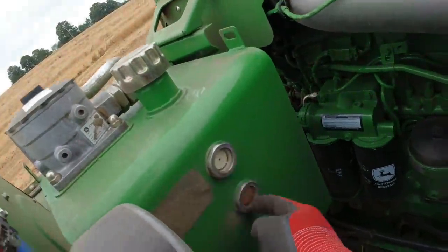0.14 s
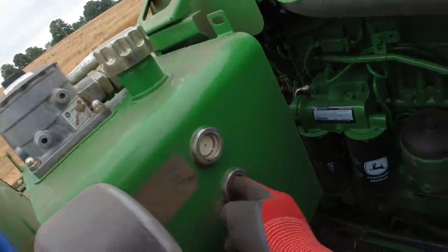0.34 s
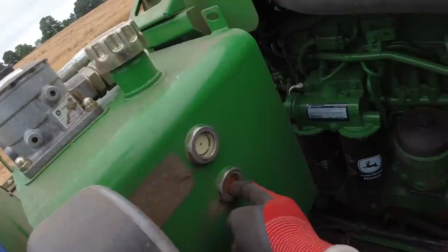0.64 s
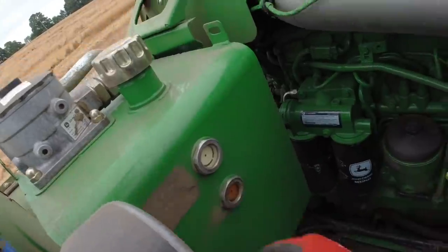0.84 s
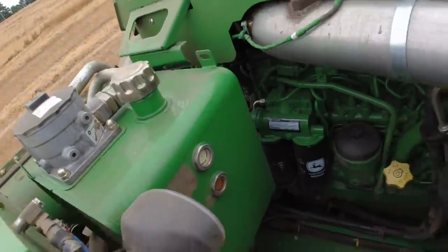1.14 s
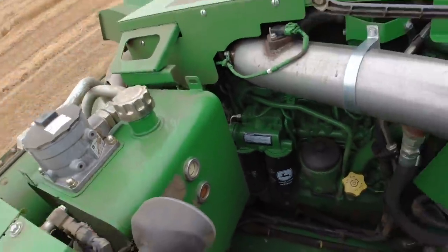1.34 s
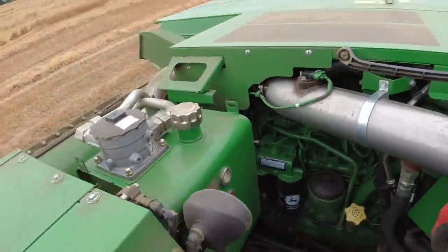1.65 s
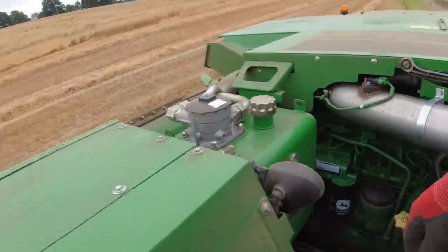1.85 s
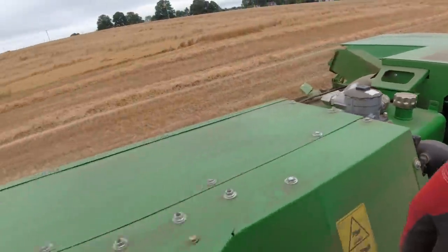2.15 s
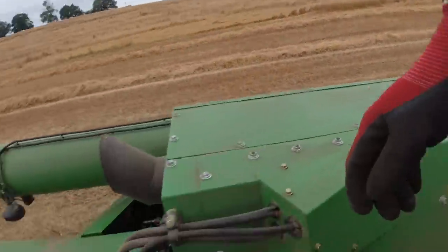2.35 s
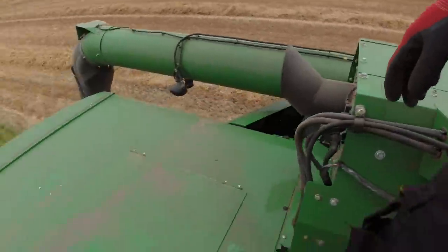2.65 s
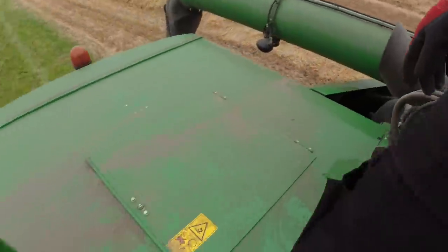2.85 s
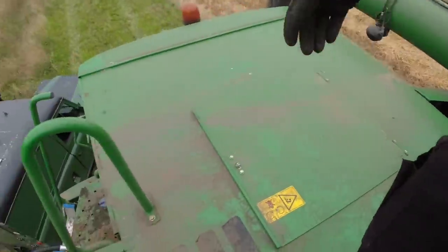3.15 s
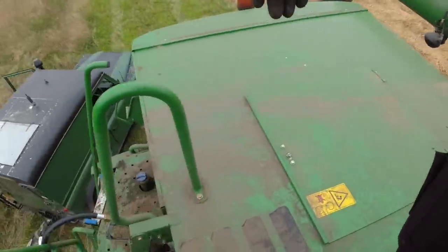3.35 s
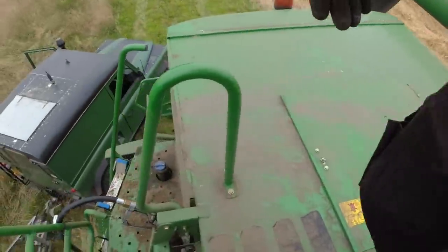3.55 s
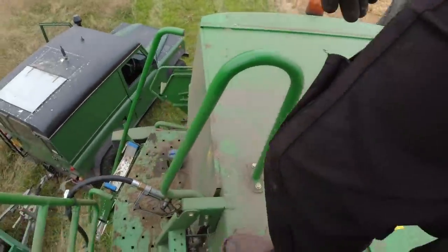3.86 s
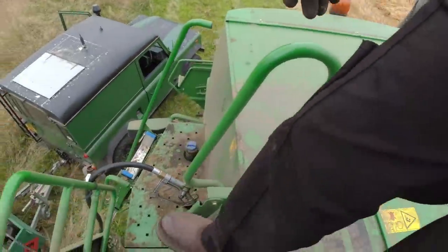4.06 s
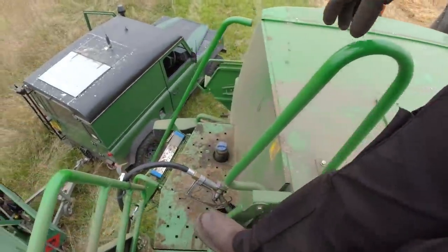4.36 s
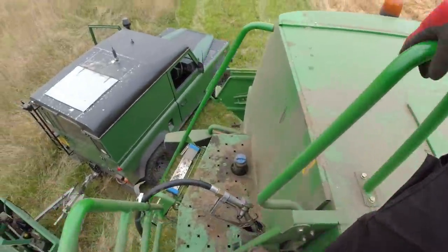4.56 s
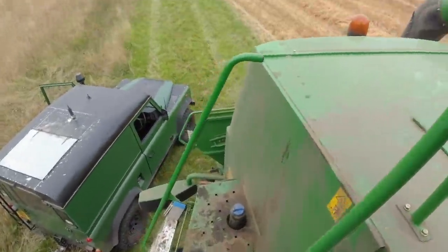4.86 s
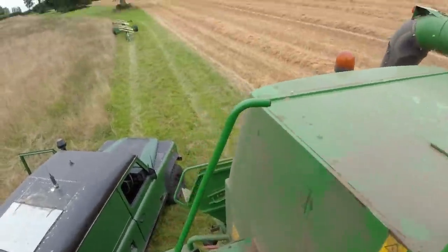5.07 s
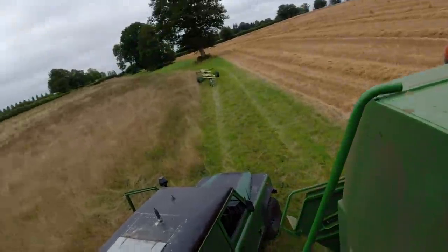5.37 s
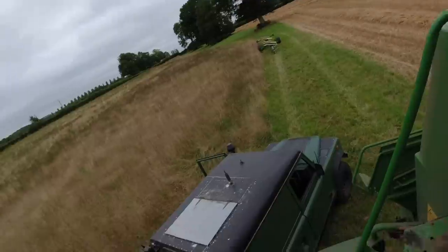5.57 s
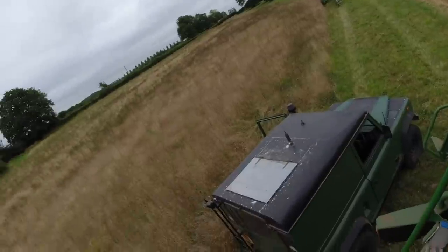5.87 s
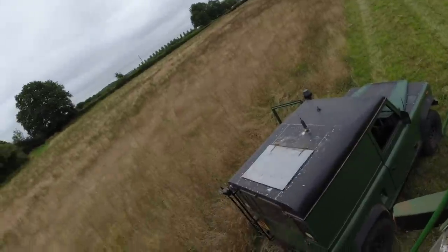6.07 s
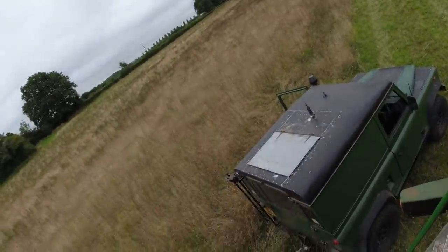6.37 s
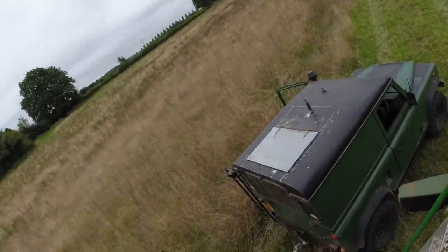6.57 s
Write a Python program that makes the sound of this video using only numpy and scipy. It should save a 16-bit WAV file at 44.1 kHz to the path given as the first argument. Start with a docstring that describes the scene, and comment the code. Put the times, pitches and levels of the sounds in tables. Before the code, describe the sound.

Wind thumps and rumbles in uneven gusts on a head-worn microphone outdoors. At first there is only soft clothing rustle and a shielded, quiet pump whine beneath it. Two hollow footfalls sound on a metal deck about a second apart, the first trailed by a light clinking. Then the electric pump below comes through clearly, whining, whirring and faintly ticking at a constant pitch until the end.

```python
"""Small pump below a harvester deck

On top of a parked harvester in a windy field, with a head-worn microphone. Somewhere below, an electric
pump whines, whirrs and faintly ticks: shielded by a tank at first, loud once we turn and step into view.
Wind buffets the diaphragm and clothes rustle close by. Underfoot, boots knock on the sheet-metal deck
and a loose fitting rattles."""
import sys
import numpy as np
from scipy import signal
from scipy.fft import rfft, irfft
from scipy.io import wavfile
from scipy.ndimage import uniform_filter1d

SR = 44100
rng = np.random.default_rng(int(sys.argv[2]) if len(sys.argv) > 2 else 0)


def transcribe(signal):
    """Save signal, clipped to [-1, 1], as a 16-bit WAV file at the path in sys.argv[1]."""
    frames = np.atleast_2d(signal).T
    limited = np.clip(frames, -1, 1)
    pcm = np.round(limited * 32767).astype(np.int16)
    wavfile.write(sys.argv[1], SR, pcm)


N = 295911
TIME = np.arange(N) / SR


def amp(db):
    return 10 ** (np.asarray(db) / 20)


def unit_rms(x):
    return x / np.sqrt(np.mean(x ** 2) + 1e-20)


def smooth(x, size):
    return uniform_filter1d(uniform_filter1d(x, size), size)


def at_pitch(spectrum, hz):
    f, db = np.transpose(spectrum)
    return np.interp(np.log(hz + 1), np.log(f + 1), db)


def at_time(table, t):
    s, *columns = np.transpose(table)
    return np.array([np.interp(t, s, column) for column in columns])


def drift(t, top_hz, count):
    """Rows of random wander near rms 1: sines of random phase, the slow ones larger."""
    f = np.geomspace(top_hz / 10, top_hz, 12)
    waves = np.sin(2 * np.pi * (f[:, None] * t + rng.random((count, len(f), 1)))) / np.sqrt(f)[:, None]
    return waves.sum(1) / np.sqrt(np.sum(.5 / f))


def coloured(x, spectrum):
    return irfft(rfft(x) * amp(at_pitch(spectrum, np.fft.rfftfreq(len(x), 1 / SR))), len(x))


def resonant_noise(length, peaks):
    """Noise through broad resonances, each passed twice for steep sides; rms 1."""
    noise = rng.standard_normal(length)
    filters = [(amp(db), signal.iirpeak(hz, hz / width, SR)) for hz, width, db in peaks]
    return unit_rms(sum(gain * signal.lfilter(*ba, signal.lfilter(*ba, noise)) for gain, ba in filters))


def shaped_noise(db, size):
    """Noise whose density in dB is given for every bin and frame."""
    bins = rng.standard_normal(db.T.shape).T + 1j * rng.standard_normal(db.T.shape).T
    return signal.istft(bins * amp(db) * np.sqrt(SR / size), nperseg=size, noverlap=size * 3 // 4)[1][:N]


def decay(t, db, t60):
    return amp(db - 60 * t / t60)


def struck_modes(t, modes, uneven_db, pitch=1):
    """Decaying sines of struck metal, in a new mix for each strike."""
    mix_db = uneven_db * rng.standard_normal(len(modes))
    return sum(decay(t, db + offset, t60) * np.sin(2 * np.pi * pitch * hz * t)
               for (hz, db, t60), offset in zip(modes, mix_db))


# Where we stand. Each row: time in seconds, stance (0 behind the tank, 4 facing the pump, 8 turned away).
STANCE = [(1.6, 0), (2.35, 1), (3.0, 2), (3.5, 3), (3.95, 4), (4.6, 5), (5.25, 6), (5.75, 7), (6.5, 8)]


def by_stance(db, t):
    """Blends levels given at evenly spaced stances as the microphone moves."""
    return np.interp(at_time(STANCE, t)[0], np.linspace(0, STANCE[-1][1], len(db)), db)


# How much of the pump reaches the microphone. Each row: time in seconds, path level in dB.
PATH = [(0.0, -74.5), (0.55, -72.5), (1.0, -74), (1.8, -72.5), (2.05, -66.5), (2.4, -65), (2.67, -62),
        (2.9, -54.5), (3.1, -50), (3.38, -45), (3.5, -45.5), (3.65, -44), (3.85, -42), (4.3, -44.5),
        (4.75, -46), (5.05, -49.5), (5.22, -53.5), (5.44, -51.5), (5.65, -48.5), (6.0, -48), (6.3, -48),
        (6.71, -47.5)]
# Its colour from where we stand. Each row: frequency in Hz, then gain in dB at each of nine stances.
PATH_COLOUR = [(400, -1.5, -1, -12.5, -16, -12.5, -10.5, -13, -13, -13.5),
               (990, -3, -2, -9.5, -10, -9.5, -6.5, -4.5, -7.5, -7),
               (1750, -2, -5.5, -1, -2.5, -4.5, -4, 1.5, -5, -5.5),
               (2730, -1, -4.5, -3.5, -2, -1.5, -3, 5, -2.5, -2),
               (4160, -20, -13, -16.5, -13.5, -13, -9.5, -14, -9.5, -10.5),
               (5500, -16, -11, -11, -9.5, -10.5, -11.5, -7, -4.5, -5.5),
               (7740, -17, -11.5, -10, -13.5, -15, -10.5, -6, -6, -9),
               (11000, -17, -14, -8.5, -12.5, -12, -11, -9, -7.5, -10.5)]


def path_db(hz, t):
    """The way from pump to microphone at each pitch and moment: one level, coloured by the stance."""
    bands = np.arange(len(PATH_COLOUR))
    place = np.interp(np.log(hz + 1), np.log([row[0] for row in PATH_COLOUR]), bands)
    shares = np.maximum(1 - abs(place[:, None] - bands), 0)
    return at_time(PATH, t)[0] + shares @ np.array([by_stance(db, t) for _, *db in PATH_COLOUR])


# The clearest shaft orders (multiples of the turning rate) swell and fade as the head moves.
# Each row: time in seconds, then levels in dB of orders 10, 12 and 15.
WHINE = [(0.0, -75, -78, -76), (0.7, -70.5, -75.5, -75.5), (1.1, -75.5, -78, -70), (1.4, -65, -79, -69.5),
         (1.57, -62.5, -78, -74), (1.68, -60.5, -82, -85), (1.83, -66, -78, -70), (2.1, -60, -80, -72),
         (2.27, -78, -74, -73), (2.4, -68.5, -75, -74), (2.5, -68.5, -73, -60), (2.63, -63, -70, -86),
         (2.73, -55.5, -63.5, -84), (2.93, -47, -55.5, -60), (3.2, -46, -54, -52), (3.45, -45.5, -51, -48),
         (3.74, -41.5, -55, -48.5), (3.94, -38.5, -50.5, -45.5), (4.15, -38.5, -56, -44.5),
         (4.4, -40, -61, -47), (4.75, -37, -52.5, -48.5), (5.1, -38.5, -60, -53.5),
         (5.23, -39.5, -63.5, -69), (5.42, -39, -78, -53.5), (5.6, -40, -74, -47.5),
         (5.8, -41.5, -76, -47.5), (6.1, -39.5, -70, -45.5), (6.4, -39.5, -61, -48.5),
         (6.71, -40.5, -69, -48.5)]
# Two neighbours beat into a buzz. Each row: time in seconds, then levels in dB of orders 35 and 36.
BUZZ = [(0.0, -83.5, -92), (0.7, -81, -88), (1.4, -89, -92), (1.68, -97, -92), (2.27, -78, -84),
        (2.55, -86, -85), (2.85, -64, -66), (3.0, -56, -61), (3.08, -62, -67), (3.43, -50, -55.5),
        (3.82, -61, -57), (3.95, -60, -52), (4.23, -51, -56), (4.31, -59, -60), (4.34, -55, -55),
        (4.37, -64, -59), (4.64, -49.5, -51), (4.74, -48.5, -56), (4.99, -53.5, -69), (5.13, -55, -68),
        (5.2, -65, -58), (5.27, -58, -62), (5.34, -70, -65), (5.44, -52, -55), (5.58, -51, -63),
        (5.7, -60, -63), (5.72, -62, -55), (6.14, -64, -60), (6.29, -55, -52), (6.36, -61, -61),
        (6.39, -55, -57), (6.7, -55, -55)]
# A rough, high ringing. Each row: time in seconds, then levels in dB of orders 90 and 135.
RING = [(1.8, -105, -105), (2.05, -88, -100), (2.12, -88, -100), (2.35, -86, -95), (2.55, -97, -89),
        (2.75, -82, -75), (2.95, -75, -74), (3.1, -73, -82), (3.4, -77, -80), (3.7, -59.5, -73),
        (3.78, -66, -73), (3.88, -72, -73), (3.94, -56, -71), (4.03, -62, -72), (4.1, -68, -80),
        (4.2, -84, -84), (4.55, -71, -78), (4.8, -75, -70), (5.1, -86, -86), (5.5, -83, -72),
        (5.75, -73, -80), (6.1, -84, -80), (6.71, -84, -76)]
# Weaker tones. Each row: order, then dB on the path level behind the tank, facing and turned away.
OVERTONES = [(3, -14, -11, -10), (6, -24, -24, -24), (9, -26, -19, -12), (14, -17, -12, -9),
             (16, -18, -19, -16), (19, -28, -22, -30), (22, -22, -18, -17), (24, -18, -16, -24),
             (26, -33, -19, -21), (33, -40, -16, -19), (34, -21, -26, -23), (37, -31, -23, -26),
             (39, -27, -17, -16), (41, -28, -22, -21), (43, -34, -23, -24), (44, -28, -18, -18),
             (46, -29, -25, -26), (47, -40, -29, -27)]
# The orders that change most with where we stand, and a row of levels for each.
# Each row: dB on the path level at each of nine stances.
SHRILL_ORDERS = [5, 7, 11, 20, 25, 29, 30, 40, 45, 56, 57, 60, 61, 62, 65, 70, 71, 75, 89, 93, 95, 99, 105,
                 119, 120, 125, 126, 140, 150, 154, 170, 200, 205, 215]
SHRILL = [(1.5, -3.5, -20, -18.5, -13, -7.5, -22, -14.5, -11.5),
          (-11, -12.5, -22.5, -19.5, -15, -24, -29, -12, -10.5),
          (-8, -21, -33, -37, -30, -10.5, -9, -14.5, -15), (-19, -19, -11, -21, -19, -17, -8, -7.5, -7.5),
          (-9.5, -20, -7.5, -9.5, -16.5, -9, -10.5, -9.5, -17.5),
          (-44, -17, -13, -8.5, -8.5, -11, -11, -7.5, -5), (-9.5, -18, -12, -13, -25, -9, -17, -9, -18),
          (-18, -21, -3.5, -13, -12.5, -18, -10.5, -13, -13),
          (-54, -35, -11, -12, -19, -16, -21, -12.5, -12.5), (-34, -29, -26, -24, -37, -42, -42, -44, -43),
          (-28, -41, -35, -41, -28, -24, -23, -22, -16), (-43, -41, -24, -33, -40, -29, -40, -45, -43),
          (-39, -46, -23, -29, -36, -33, -40, -45, -44), (-49, -42, -39, -45, -40, -40, -45, -43, -35),
          (-33, -40, -33, -40, -40, -30, -23, -30, -17), (-39, -30, -28, -38, -27, -20, -24, -19, -19),
          (-50, -40, -43, -42, -36, -39, -40, -35, -18), (-43, -31, -45, -23, -18.5, -34, -35, -20, -40),
          (-43, -42, -43, -36, -28, -40, -36, -40, -23), (-36, -42, -26, -35, -36, -32, -33, -41, -34),
          (-42, -38, -35, -45, -35, -22, -31, -19, -22), (-42, -38, -42, -39, -35, -31, -45, -26, -33),
          (-43, -35, -40, -35, -41, -19, -20, -26, -19), (-43, -43, -41, -44, -40, -42, -40, -39, -23),
          (-45, -30, -45, -42, -44, -31, -30, -29, -19), (-45, -28, -33, -46, -42, -40, -33, -38, -23),
          (-35, -33, -31, -40, -42, -39, -32, -29, -23), (-24, -40, -42, -38, -24, -34, -27, -37, -26),
          (-38, -39, -27, -24, -26, -35, -34, -44, -44), (-42, -39, -42, -40, -30, -40, -40, -35, -25),
          (-42, -46, -41, -35, -32, -41, -40, -43, -44), (-47, -39, -27, -38, -43, -32, -30, -36, -30),
          (-44, -41, -35, -41, -37, -37, -27, -25, -34), (-42, -38, -42, -40, -36, -33, -33, -35, -32)]
# Three glints in the treble: their orders, and their levels in dB on the coloured path.
GLINT_ORDERS = [50, 107, 155]
GLINT_DB = [-24, -21, -25]
SHAFT_HZ, TOP_ORDER = 53.43, 225


def pump_whine(wobble=.0008, flicker_db=.8, over_whirr_db=8, vane_db=3, neighbour_db=-7):
    """Sines locked to one slightly wavering shaft; returns the sound and the running count of turns."""
    t = TIME[::256]
    speed = SHAFT_HZ * (1 + wobble * drift(t, top_hz=4, count=1)[0])
    turns = np.cumsum(np.interp(TIME, t, speed)) / SR
    path_level = at_time(PATH, t)[0]

    levels = dict(zip((10, 12, 15), at_time(WHINE, t) + flicker_db * drift(t, top_hz=24.89, count=3)))
    levels.update(zip((35, 36), at_time(BUZZ, t) + flicker_db * drift(t, top_hz=24.35, count=2)))
    for (order, *db), fade_db in zip(OVERTONES, 1.8 * drift(t, top_hz=3.5, count=len(OVERTONES))):
        levels[round(order)] = path_level + by_stance(db, t) + fade_db

    # a comb of high orders follows the whirr's spectrum, multiples of the five vanes louder
    high = np.arange(max(levels) + 1, TOP_ORDER)
    comb_db = at_pitch(WHIRR, high * SHAFT_HZ) + over_whirr_db + vane_db * (high % 5 == 0)
    comb_db += 2.5 * rng.standard_normal(len(high))
    comb_db[np.array(GLINT_ORDERS) - high[0]] = GLINT_DB
    fades_db = 4 * drift(t, top_hz=2.5, count=len(high))
    levels.update(zip(high, comb_db[:, None] + path_db(high * SHAFT_HZ, t) + fades_db))

    shrill_db = path_level + np.array([by_stance(db, t) for db in SHRILL])
    shrill_db += 1.3 * drift(t, top_hz=5, count=len(SHRILL))
    shrill_db += flicker_db * drift(t, top_hz=25.11, count=len(SHRILL))
    levels.update(zip(SHRILL_ORDERS, shrill_db))

    ring_db = at_time(RING, t) + 1.8 * drift(t, top_hz=59.9, count=2)
    levels.update(zip((90, 135), ring_db))
    levels.update(zip((91, 136), ring_db + neighbour_db))  # each pair beats once a turn

    out, phasor = np.zeros(N), np.ones(N, complex)
    shaft = np.exp(2j * np.pi * turns)
    for order, phase in enumerate(np.exp(2j * np.pi * rng.random(TOP_ORDER - 1)), start=1):
        phasor *= shaft  # spins at order times the shaft's speed
        if order in levels:
            out += np.sqrt(2) * np.interp(TIME, t, amp(levels[order])) * (phase * phasor).imag
    return out, turns


# The rush from the pump below. Each row: frequency in Hz, density in dB on the coloured path.
WHIRR = [(120, -27), (240, -17.5), (340, -25), (450, -27), (700, -28), (1100, -29.5), (1500, -30.5),
         (2200, -37), (2900, -43), (4000, -33.5), (6000, -35.5), (8000, -40), (11000, -47), (12500, -53.5),
         (14500, -57.5), (15700, -79)]


def pump_whirr(turns, patchy_db=2, shaft_depth=.12, vane_depth=.18, throb_below_hz=2800):
    """Brush and flow noise in drifting patches; the low part throbs each turn and at each of five vanes."""
    hz, t = np.fft.rfftfreq(1024, 1 / SR), np.arange(N // 256 + 5) * 256 / SR
    patches = rng.standard_normal((len(t), len(hz))).T
    patches = unit_rms(uniform_filter1d(uniform_filter1d(patches, size=8, axis=0), size=40, axis=1))
    noise = shaped_noise(path_db(hz, t) + at_pitch(WHIRR, hz)[:, None] + patchy_db * patches, size=1024)
    low = signal.sosfiltfilt(signal.butter(4, throb_below_hz, fs=SR, output="sos"), noise)
    throb = shaft_depth * np.cos(2 * np.pi * turns) + vane_depth * np.cos(2 * np.pi * 5 * turns)
    return noise + low * throb


# Breeze off the field. Each row: time in seconds, then sway, heave and flutter levels in dB.
BREEZE = [(0.0, -53, -55, -58), (0.36, -51, -48, -62), (0.6, -39, -34, -64), (0.7, -60, -47, -61),
          (0.9, -57, -62, -60.5), (1.3, -70, -63, -62), (1.6, -40, -36, -42), (2.15, -41, -40.5, -46),
          (2.24, -53, -61, -53), (2.5, -19, -41, -56), (2.7, -19, -42, -51), (2.78, -31, -48, -53),
          (2.9, -40, -42, -49.5), (3.05, -36, -48, -57.5), (3.2, -36, -46, -58), (3.38, -54, -61, -51),
          (3.6, -41, -30, -59), (4.15, -34, -32, -34), (4.6, -38, -29, -45), (5.0, -49, -29.5, -56),
          (5.5, -43, -36, -46), (6.0, -39, -34, -56.5), (6.28, -42, -38, -48.5), (6.71, -33, -32, -50)]
# Gusts right on the microphone. Each row: start and length in seconds, heave and buffet levels in dB.
GUSTS = [(0.172, 0.11, -23, -40.5), (0.441, 0.16, -30.5, -38.5), (1.378, 0.018, -14, -37),
         (1.44, 0.068, -24, -53), (1.513, 0.072, -13.5, -30), (1.656, 0.016, -32, -38),
         (1.954, 0.12, -19.5, -52), (2.293, .12, -12.5, -24), (2.438, 0.032, -17.5, -31.5),
         (2.51, 0.046, -28, -38.5), (2.098, 0.072, -37, -35), (2.811, 0.034, -24, -46),
         (3.452, 0.048, -17, -37.5), (3.563, 0.079, -29.5, -37.5), (3.698, 0.04, -40, -31),
         (3.79, 0.055, -36, -38), (3.885, 0.019, -21, -43), (3.982, 0.19, -13.5, -26.5),
         (4.235, 0.062, -10.5, -23), (4.343, 0.087, -12, -26.5), (4.527, 0.027, -20, -27),
         (4.607, 0.027, -28, -34.5), (4.723, 0.056, -24, -59), (4.893, 0.15, -25, -42),
         (5.274, 0.11, -20.5, -36.5), (5.685, 0.12, -13, -33.5), (5.904, 0.057, -31, -45),
         (6.108, 0.034, -26, -57), (6.378, 0.015, -4.5, -32), (6.498, 0.031, -24, -51),
         (6.6, 0.045, -28, -32)]


def wind_levels(rise_db_per_s=705, fall_db_per_s=312, breeze_buffet_db=4, gust_flutter_db=-15.5):
    """Sway, heave, buffet and flutter in dB: a breeze, and gusts that strike fast, hold and die away."""
    t = TIME[::64]
    sway, heave, flutter = at_time(BREEZE, t)
    power = amp([heave, flutter + breeze_buffet_db, flutter]) ** 2
    for start, length, heave_db, buffet_db in GUSTS:
        edges_db = np.minimum((t - start) * rise_db_per_s, (start + length - t) * fall_db_per_s)
        held_db = np.array([heave_db, buffet_db, buffet_db + gust_flutter_db])
        power += amp(held_db[:, None] + np.minimum(edges_db, 0)) ** 2
    return [np.interp(TIME, t, db) for db in (sway, *10 * np.log10(power))]


# Four bands of wind at the diaphragm, slowest first. Each row: frequency in Hz, gain in dB.
SWAY = [(1, -6.5), (4, 5), (12, -6.5), (20, -8), (30, -32), (60, -76), (1000, -190)]
HEAVE = [(2, -8.5), (5, -0.5), (16, -2.5), (28, -8.5), (45, -41), (80, -52), (200, -100.5), (1000, -170)]
BUFFET = [(15, -36.5), (35, 6), (55, 0.5), (80, -6), (130, -44), (300, -83), (1500, -160)]
FLUTTER = [(40, -7.5), (85, 6.5), (130, -0.5), (200, -8), (300, -26), (450, -30.5), (800, -69),
           (3000, -150)]


def wind(eddies_per_s=(66, 60, 120, 360), uneven_db=2.5, average_s=.086):
    """Single eddies press on the diaphragm: a slow sway, a heave, heavy buffets and a quicker flutter."""
    out = np.zeros(N)
    for spectrum, db, rate in zip((SWAY, HEAVE, BUFFET, FLUTTER), wind_levels(), eddies_per_s):
        eddies = (rng.random(N) < rate / SR) * rng.choice([-1, 1], N)
        pressure = coloured(eddies * amp(uneven_db * rng.standard_normal(N)), spectrum)
        # even out the eddies so that breeze and gusts set the strength
        power = smooth(pressure ** 2, int(average_s * SR))
        out += amp(smooth(db, 400)) * pressure / np.sqrt(power + .29 * power.mean())
    return out


# Clothes, just under the microphone.
# Each row: middle in seconds, hiss and crease levels in dB, half length in seconds.
RUSTLES = [(.01, -71.5, -75, 0.022), (0.085, -75.5, -78, 0.032), (0.114, -68, -58.5, 0.006),
           (0.149, -95, -71, 0.012), (0.353, -76, -81, 0.018), (0.44, -82, -79, 0.04),
           (0.47, -88, -91, 0.11), (0.55, -77, -81, 0.021), (0.649, -74.5, -71, 0.018),
           (0.747, -75.5, -76, 0.023), (0.796, -74.5, -64.5, 0.014), (1.17, -85, -83, .05),
           (1.244, -71, -70.5, 0.02), (1.407, -71, -75, 0.06), (1.409, -76, -63, 0.011),
           (2.66, -86, -61.5, 0.04)]
# The colours of sliding and creasing cloth. Each row: centre and width in Hz, gain in dB.
CLOTH_HISS = [(6700, 1800, 22), (4900, 6200, 30), (10500, 6000, -16)]
CREASE = [(950, 560, 14), (1570, 1500, 31), (1810, 230, 22.5), (3200, 2200, -7)]


def clothes_rustle(grainy_db=2.2):
    """Cloth slides for a moment: a swell of grainy hiss with a duller crease."""
    hiss, crease = np.zeros(N), np.zeros(N)
    for middle, hiss_db, crease_db, half_length in RUSTLES:
        swell = np.exp(-abs((TIME - middle) / half_length) ** 1.9)
        hiss += amp(hiss_db) * swell
        crease += amp(crease_db) * swell
    grain = amp(grainy_db * unit_rms(uniform_filter1d(rng.standard_normal(N), size=130)))
    return grain * (hiss * resonant_noise(N, CLOTH_HISS) + crease * resonant_noise(N, CREASE))


# A faint tick down in the machine. Each row: centre and width in Hz, gain in dB.
TICK = [(1300, 620, 11), (2160, 2000, -1)]
# Its level at each of nine stances, in dB on the path level.
TICK_DB = [-6, 0, -5, 8, 3.5, 3, 3, -1, -2]


def machine_ticks(first_s=.0545, every_s=.1351, uneven_db=1.5, t60=.05, rise_s=.002):
    """A short dull tick at a steady beat, rising and falling with the pump's path level."""
    out, t = np.zeros(N), TIME[:SR // 10]
    attack = 1 - np.exp(-t / rise_s)
    for start in np.arange(first_s, TIME[-1], every_s):
        db = at_time(PATH, start)[0] + by_stance(TICK_DB, start) + uneven_db * rng.standard_normal()
        tick = attack * decay(t, db, t60) * resonant_noise(len(t), TICK)
        slot = out[round(start * SR):][:len(t)]
        slot += tick[:len(slot)]
    return out


# Boots, a body's height below the microphone. Each row: start in seconds; grit, clack, thump, boom and
# ring levels in dB; thump pitch in Hz; thump t60 and rise time in seconds; clack and grit pitch as
# ratios; boom pitch in Hz.
KNOCKS = [(1.879, -95, -52, -30.5, -50, -57, 480, 0.038, 0.0014, 0.64, 1, 110),
          (1.882, -32.5, -35, -39, -50, -47, 487, 0.092, 0.0033, 1, 0.95, 110),
          (1.893, -56, -51, -20.5, -16.5, -45, 309, 0.1, 0.011, 0.86, .93, 106.3),
          (1.973, -38.5, -39.5, -39, -58, -41, 420, 0.068, 0.00044, 0.85, 1.06, 110),
          (2.749, -95, -47.5, -25.5, -25.5, -42, 400, 0.074, 0.0034, 0.59, 1, 132),
          (2.765, -95, -50, -29.5, -34, -54, 206, 0.12, 0.0026, 0.52, 1, 150),
          (2.787, -95, -56, -31, -43, -47.5, 216, 0.17, 0.003, 0.66, 1, 165)]
# Grit and clack under the sole. Each row: centre and width in Hz, gain in dB.
GRIT = [(4400, 4000, 18), (5940, 3400, 23), (8040, 5200, -9), (10200, 3100, -13)]
CLACK = [(680, 560, 30.5), (1220, 1240, 35), (1910, 1400, 17), (2830, 450, -13)]
# The soft sole dulls the thump. Each row: frequency in Hz, gain in dB.
SOLE = [(70, -8), (110, 17), (500, 1.5), (1000, -44), (3000, -32)]
# The sheet metal we stand on. Each row: frequency in Hz, level in dB, t60 in seconds.
DECK_MODES = [(123, 7, 0.12), (147.5, -4, 0.35), (172, -10, 0.63), (208.3, -1, 0.66), (253, -4, 0.28),
              (286.3, -1, 0.25), (304, -2, 0.26), (320, 0, 0.049), (388, -1.5, 0.14), (422, -5, 0.12),
              (488, -11, 0.21), (597, -2.5, 0.12), (664, -17, 0.18), (831, -8, 0.13), (930, -12.5, 0.092),
              (1125, -10, 0.076)]


def boot_knocks(scrape_s=.063):
    """A sole lands with grit, clack and thump; the deck booms as it flexes and rings in its modes."""
    out, t = np.zeros(N), TIME[:SR // 2]
    for (start, grit_db, clack_db, thump_db, boom_db, ring_db,
         thump_hz, thump_t60, rise_s, clack_pitch, grit_pitch, boom_hz) in KNOCKS:
        grit = resonant_noise(len(t), np.multiply(GRIT, [grit_pitch, grit_pitch, 1]))
        clack = resonant_noise(len(t), np.multiply(CLACK, [clack_pitch, clack_pitch, 1]))
        thud = resonant_noise(len(t), [(thump_hz, .96 * thump_hz, 0)])
        thump = unit_rms(coloured(thud, SOLE)) + .58 * np.sin(2 * np.pi * thump_hz * t)
        boom = np.sin(2 * np.pi * boom_hz * t)
        knock = grit * decay(t, grit_db, t60=.07) + clack * decay(t, clack_db, t60=.15)
        knock += thump * decay(t, thump_db, thump_t60) + boom * decay(t, boom_db, t60=.14)
        knock *= 1 - np.exp(-t / rise_s)

        modes = struck_modes(t, DECK_MODES, uneven_db=2)  # each step lands on another spot
        scrape = rng.standard_normal(len(t)) * np.exp(-t / scrape_s)
        ring = signal.fftconvolve(scrape, modes)[:len(t)]
        knock += amp(ring_db) * ring / np.sqrt(np.mean(ring[:SR // 10] ** 2))
        out[round(start * SR):][:len(t)] += knock
    return out


# A rattle just after the first step. Each row: start in seconds, level in dB, pitch as a ratio.
CLINKS = [(2.067, -66, 1.19), (2.078, -76, 1), (2.088, -71, 1), (2.095, -71, 1), (2.102, -66, 1),
          (2.108, -68, 1), (2.12, -71, .98), (2.13, -74, .96), (2.137, -75, 1), (2.162, -77, 1),
          (2.177, -74, 1.02)]
# The loose fitting. Each row: frequency in Hz, level in dB, t60 in seconds.
FITTING_MODES = [(4730, 3, 0.033), (5300, -10, .025), (5950, -6, .025), (6900, -10, .02), (8100, -10, .03)]


def fitting_rattle(rise_s=.0005):
    """Each light tap rings the modes of a loose fitting in its own mix."""
    out, t = np.zeros(N), TIME[:SR // 20]
    attack = 1 - np.exp(-t / rise_s)
    for start, db, pitch in CLINKS:
        modes = struck_modes(t, FITTING_MODES, uneven_db=3, pitch=pitch)
        out[round(start * SR):][:len(t)] += amp(db) * attack * modes
    return out


def scene():
    """Everything that reaches the microphone up on the deck, in mono."""
    whine, turns = pump_whine()
    machine = whine + pump_whirr(turns) + machine_ticks()
    return (machine + wind() + clothes_rustle() + boot_knocks() + fitting_rattle())[None]


# The microphone's own hiss. Each row: frequency in Hz, density in dB per Hz.
MIC_HISS = [(500, -125), (2000, -124), (6000, -126), (12000, -133), (16000, -142)]


def record(dry, bass_hz=150, knee_db=-17, squeeze=.65, recover_db_per_s=80, bend=.6, top_hz=15720):
    """The head-worn microphone: gain control ducks the bass in hard buffets; hiss; a band limit."""
    bass = signal.sosfiltfilt(signal.butter(2, bass_hz, fs=SR, output="sos"), dry)
    peak_db = 20 * np.log10(abs(bass) + 1e-9)
    recovery_db = TIME * recover_db_per_s
    held_db = np.maximum.accumulate(peak_db + recovery_db, axis=1) - recovery_db
    duck_db = squeeze * smooth(np.maximum(held_db - knee_db, 0), 400)
    shaken = (dry - bass) * (1 + bend * bass)  # wind pressure changes the diaphragm's sensitivity
    hiss = coloured(rng.standard_normal(N), MIC_HISS) * np.sqrt(SR / 2)
    padded = np.pad(shaken + bass / amp(duck_db) + hiss, [(0, 0), (512, 512)], "reflect")
    lowpass = signal.firwin(1025, top_hz, window=("kaiser", 9), fs=SR)
    return signal.oaconvolve(padded, lowpass[None], "valid")


dry = scene()
out = record(dry)
transcribe(out)
```